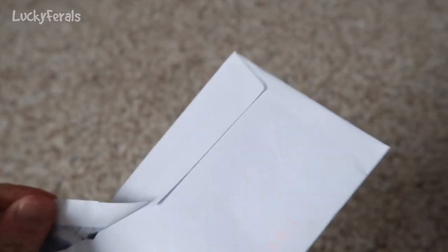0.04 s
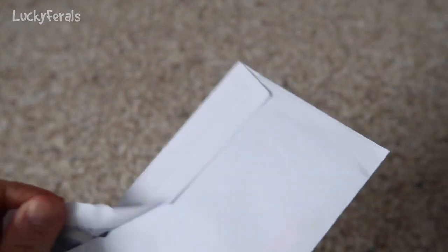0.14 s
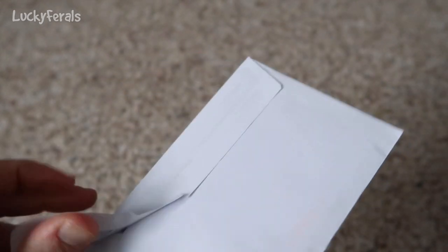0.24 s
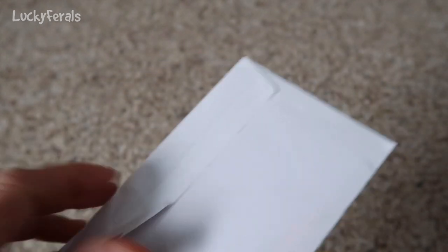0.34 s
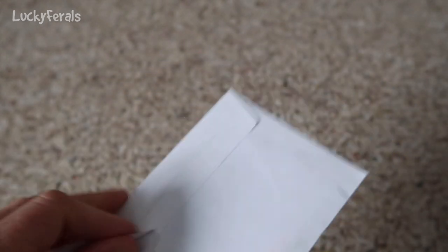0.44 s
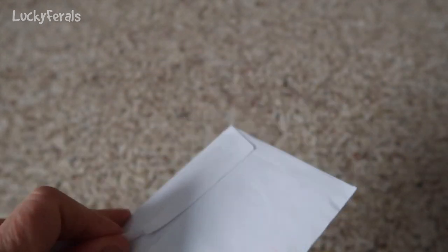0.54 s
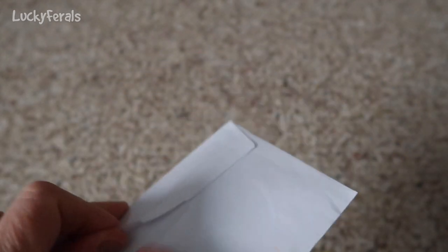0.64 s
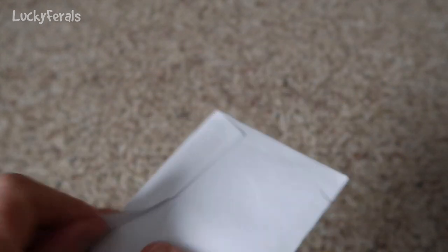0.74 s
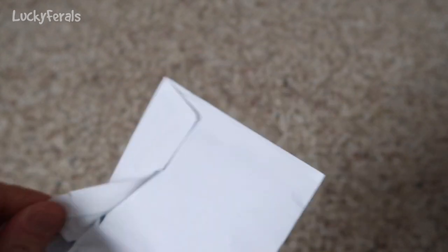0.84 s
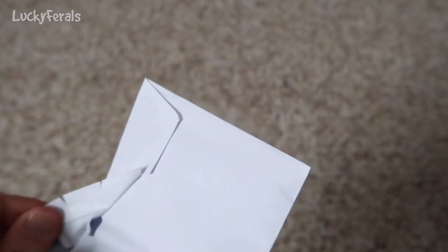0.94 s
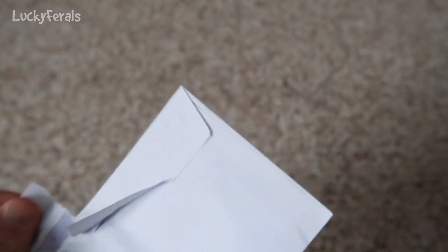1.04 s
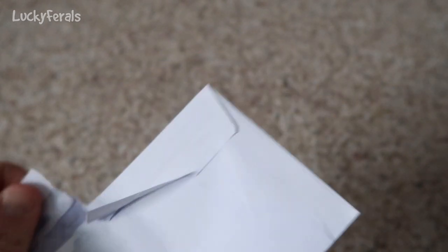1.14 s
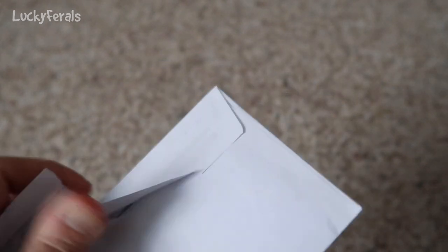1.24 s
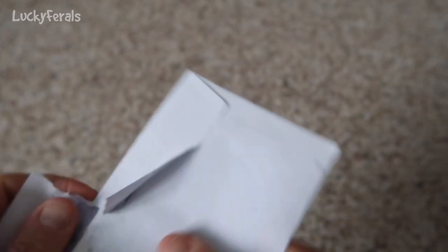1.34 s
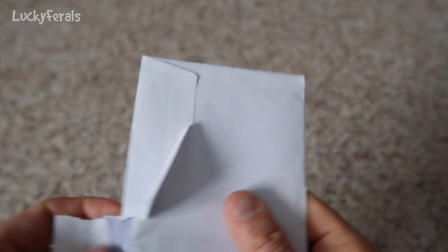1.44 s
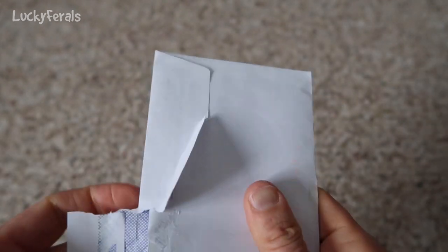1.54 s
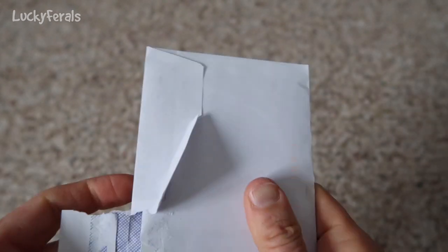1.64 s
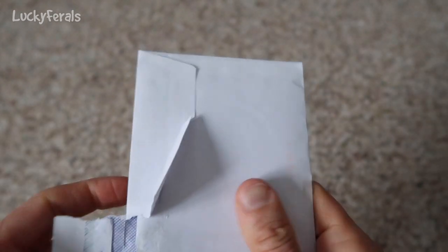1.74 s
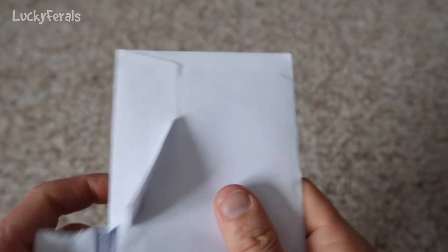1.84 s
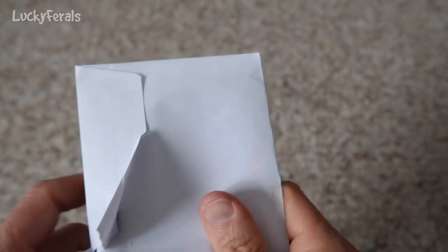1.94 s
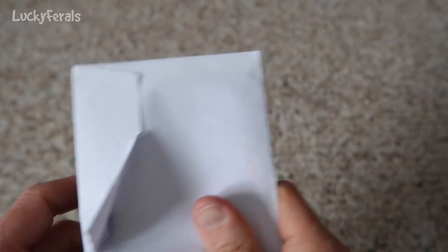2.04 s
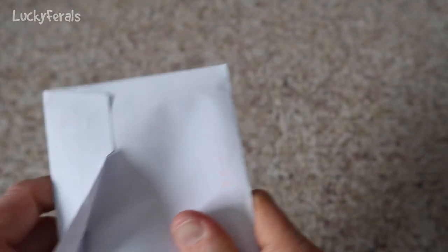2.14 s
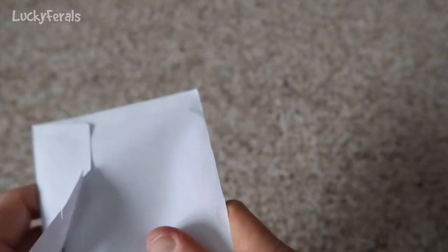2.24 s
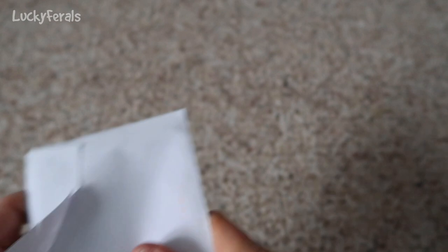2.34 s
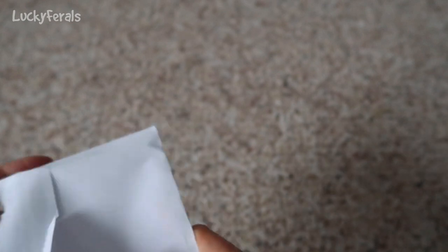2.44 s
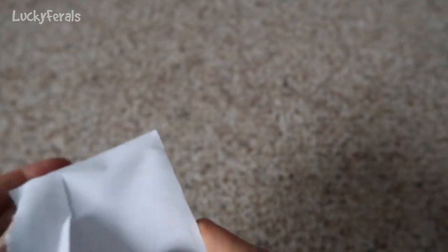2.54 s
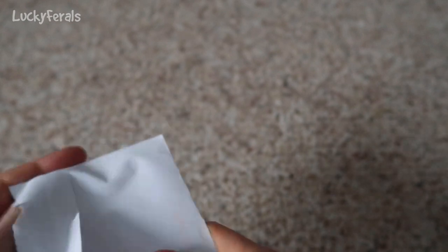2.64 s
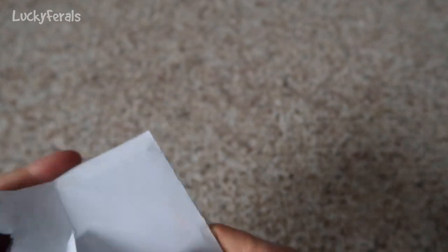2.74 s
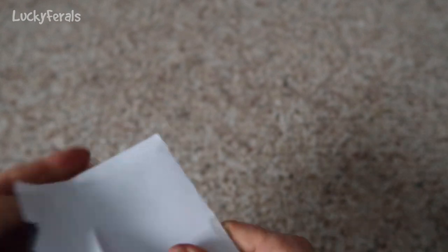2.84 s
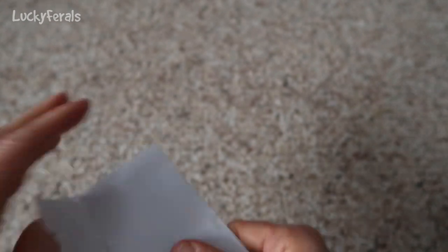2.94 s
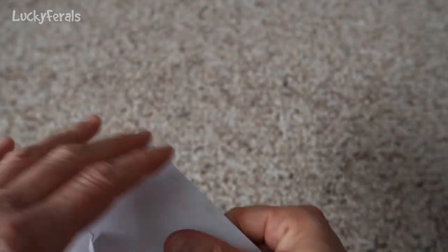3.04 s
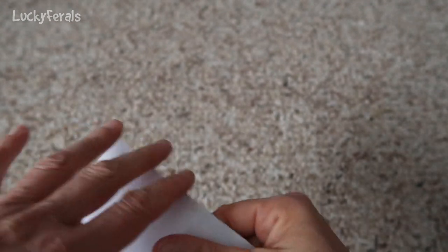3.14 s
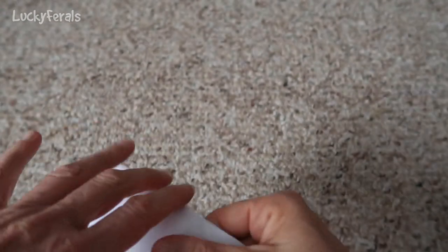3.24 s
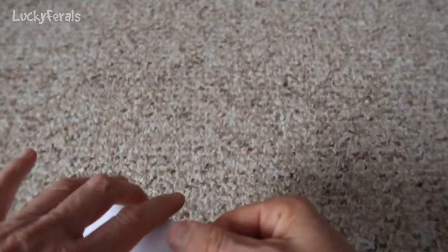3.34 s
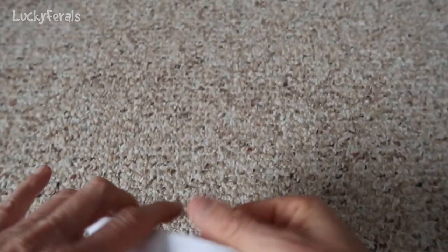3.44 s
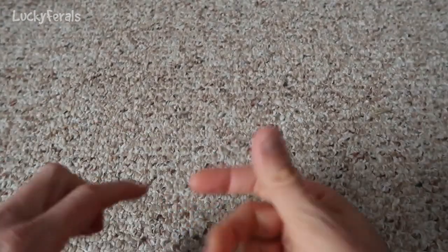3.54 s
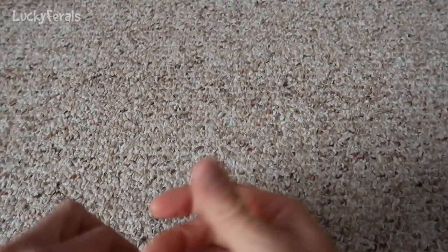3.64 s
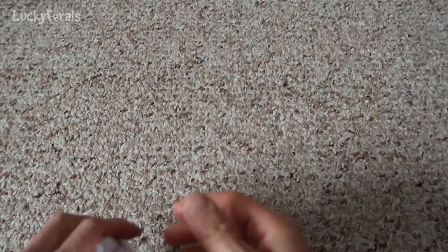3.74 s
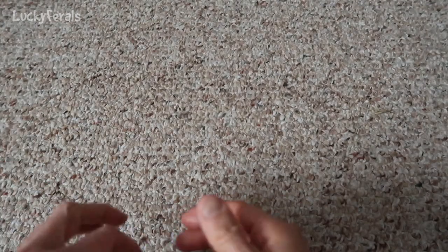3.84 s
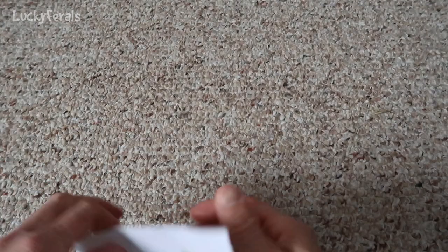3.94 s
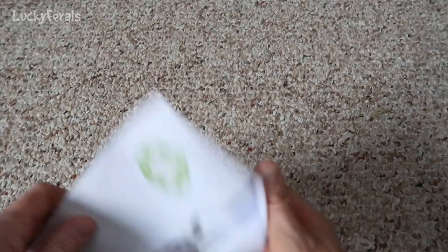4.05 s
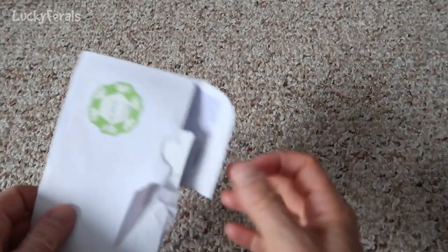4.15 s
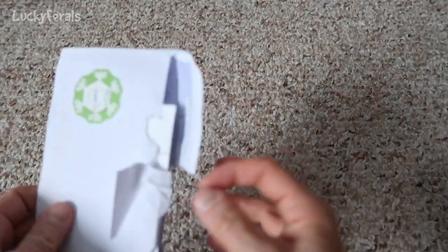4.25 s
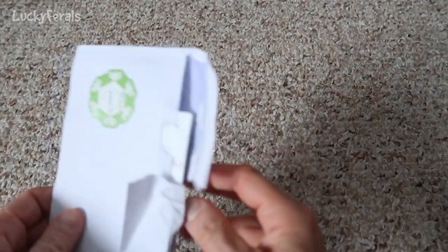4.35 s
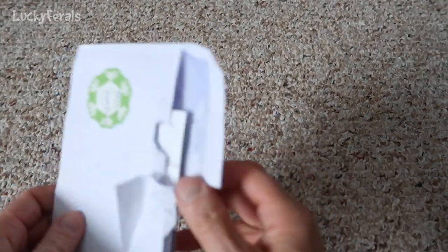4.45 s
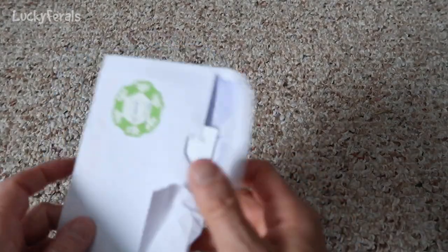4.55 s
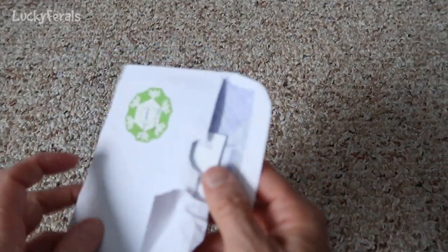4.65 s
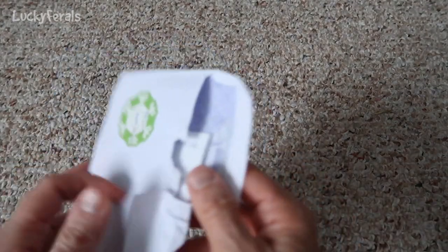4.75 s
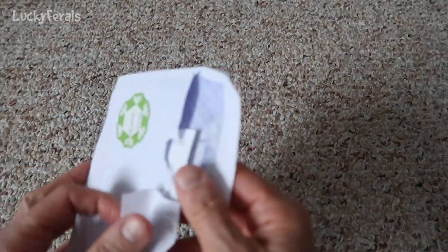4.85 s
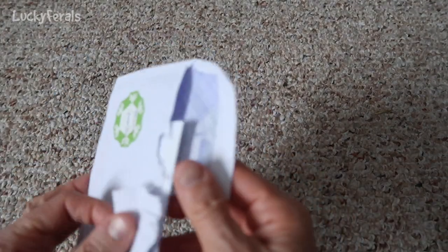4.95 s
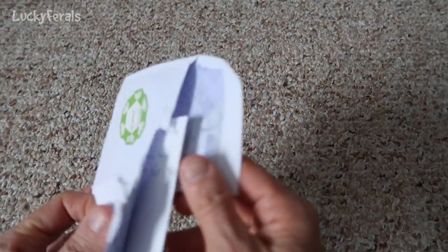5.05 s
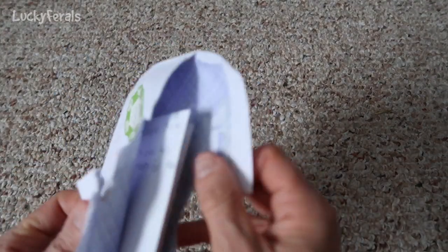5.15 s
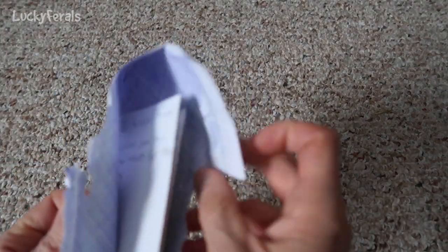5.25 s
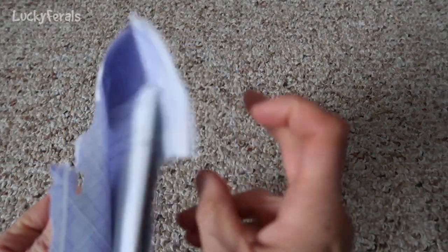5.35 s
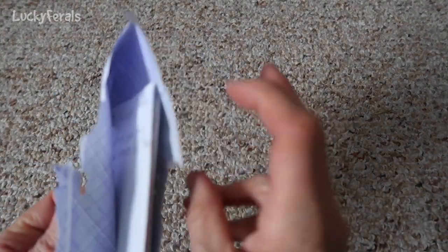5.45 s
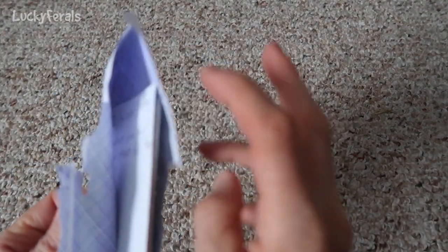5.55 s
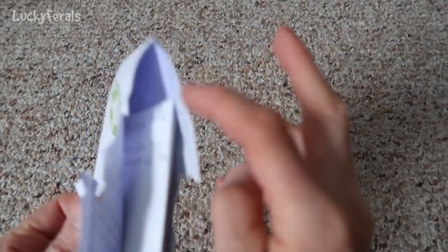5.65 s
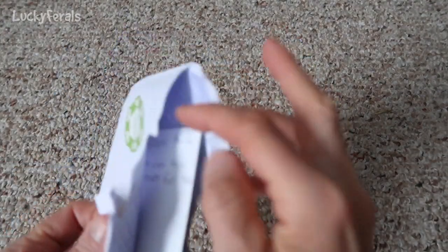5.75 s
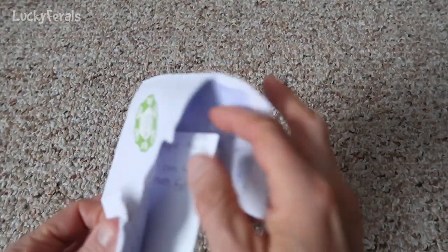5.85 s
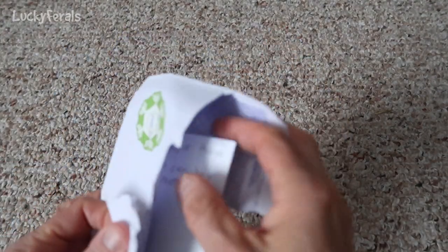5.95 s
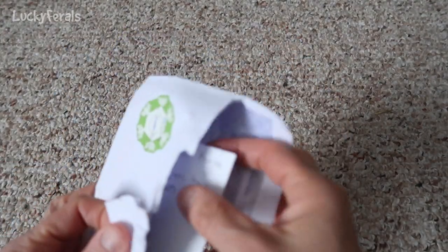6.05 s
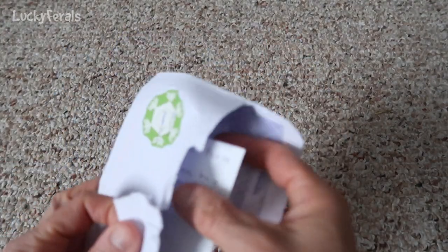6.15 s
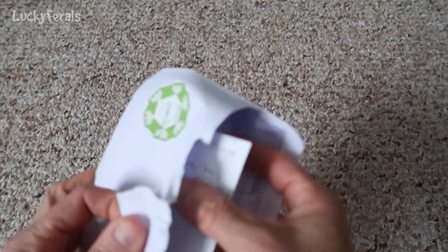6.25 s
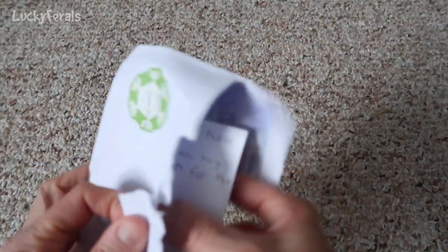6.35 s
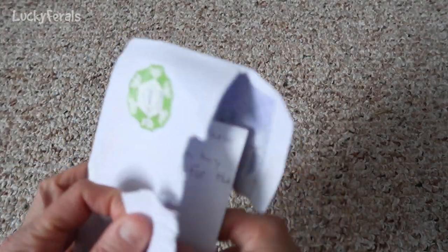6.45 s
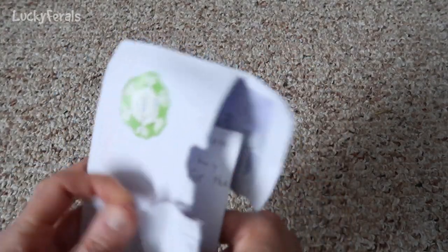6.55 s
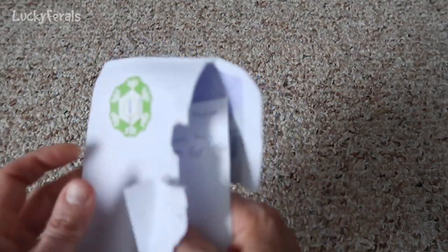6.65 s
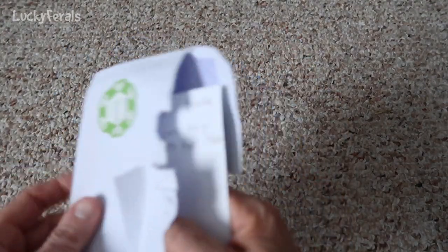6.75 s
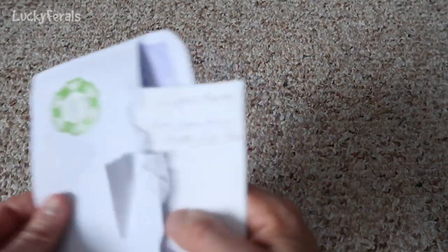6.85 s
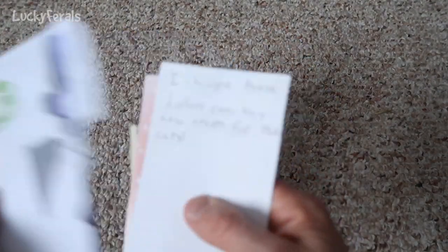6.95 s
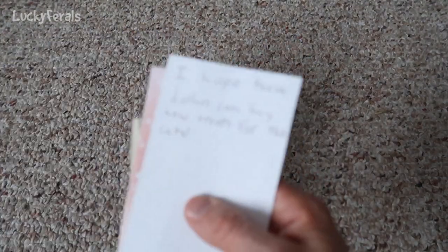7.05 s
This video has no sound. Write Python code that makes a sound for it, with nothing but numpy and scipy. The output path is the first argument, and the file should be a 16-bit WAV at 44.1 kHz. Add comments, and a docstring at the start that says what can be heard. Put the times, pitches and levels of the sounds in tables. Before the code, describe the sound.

Stiff paper tears and crinkles very near the microphone, uneven clusters of bright cracks with fibrous rasp and soft low thumps as the envelope flexes. A long quieter stretch of sparse ticks and light sliding follows, then a short strong burst of snaps and a faint closing rustle. The small room is dry, with a steady low hush.

```python
"""Hands close to a small stereo microphone tear open a paper envelope and draw out a note in a quiet carpeted room.
Rustle and soft hush run throughout: fibre clicks and sliding noise swell with each pull, over steady band noise.
Snaps crowd the first 2.5 s: bursts of small steps ring a panel, crack at the edge and push the sheet.
Soft low thumps of the flexing envelope join from 0.4 s: decaying sines about two cycles long.
Snaps are mostly sparser and fainter to 5.4 s, strong again from 5.9 to 6.5 s, then faint rustle to the end."""
import sys
import numpy as np
from scipy import signal
from scipy.fft import rfft, irfft, next_fast_len
from scipy.io import wavfile

SR = 44100
rng = np.random.default_rng(int(sys.argv[2]) if len(sys.argv) > 2 else 0)


def inscribe(sig):
    """Save sig as 16-bit PCM at rate SR to the path in sys.argv[1].

    A 1-D sig is mono; a 2-D sig holds one channel per row.
    Samples are clipped to [-1, 1] before scaling.
    """
    pcm = np.round(np.clip(np.atleast_2d(sig).T, -1, 1) * 32767)
    wavfile.write(sys.argv[1], SR, pcm.astype(np.int16))


N = 313274

# creases snapping through:
# (time [s], panel peak [dB], panel pitch [Hz], brightness [dB], burst length [ms])
CREASE_SNAPS = [(0.0065, -14.5, 3840, -3, 2), (0.0429, -12, 1230, 4, 3.6), (0.054, -9.5, 3200, 5, 9.6),
                (0.0636, -8, 3500, 13, 1), (0.0824, -15.5, 1980, -12, 2.5), (0.099, -3.5, 3020, 5, 2.5),
                (0.1408, -22, 1490, -6, 1.6), (0.144, -8.5, 1460, -2.5, 3.7),
                (0.2384, -11, 1290, -21.5, 1.94), (0.316, -18.5, 4500, -2, 1.5),
                (0.318, -10, 4100, -10, 2.5), (0.323, -10.5, 810, 6, 1.6), (0.436, -19, 1540, -13, 1.6),
                (0.4873, -10, 1680, -5, 0.57), (0.5232, -28.5, 1540, -23, 2.1), (0.559, -21, 1390, -6, 0.7),
                (0.579, -7, 1400, 0, 4.3), (0.641, -15.5, 4450, 28.5, 0.81),
                (0.6426, -23.5, 940, -34.5, 1.6), (0.703, -31, 1090, -26, 2.4), (0.799, -15, 1430, -7, 3.2),
                (0.806, -8, 2300, 20, 3.2), (0.8246, -3, 1460, 0, 2.7), (0.8301, 0, 1520, 6, 0.63),
                (0.8343, -13.5, 1900, -8, 0.72), (0.859, -13, 1080, -10, 3.2), (0.863, -16, 1200, -8, 1.7),
                (0.892, -24, 1063, 7, 0.76), (0.909, -14.5, 1120, 9, 0.62), (0.9268, -16.5, 4430, 11, 0.65),
                (0.944, -16, 1460, 5, 6.8), (0.954, -16.5, 1500, 26, 3.9), (0.984, -25, 1600, -5, 1.5),
                (0.993, -22.5, 1660, -10, 0.91), (1.0235, -14, 1640, -10, 3), (1.037, -1, 3460, 8, 2.2),
                (1.039, -1, 3470, 4, 2.4), (1.046, -8, 1290, 4, 1.9), (1.051, -5, 2520, 12, 2.5),
                (1.059, -20, 3200, 2, 2), (1.1336, -24.5, 890, -14, 2), (1.1544, -22, 1560, -4, 1.9),
                (1.208, -20.5, 2250, 5, 1.6), (1.227, -30.5, 1510, 8, 1.2), (1.2371, -8, 2040, 0, 3.1),
                (1.245, -8, 1350, -1, 1.25), (1.2502, -17.5, 1630, -10, 5.9), (1.2439, -20, 1460, -7, 1.8),
                (1.4014, -22, 1650, -12, 0.25), (1.4359, -29.5, 570, -13, 1.7),
                (1.4421, -17, 1770, 28, 1.7), (1.529, -24, 1650, 2, 5.1), (1.542, -23.5, 1940, 5, 1.8),
                (1.6643, -19.5, 1470, 6, 0.62), (1.733, -17, 1460, -2, 1.4), (1.7904, -14.5, 1230, -6, 1.5),
                (1.871, 0, 3610, -4, 1.26), (1.91, -26.5, 1300, -4, 3.3), (1.9183, -5.5, 1390, -13, 2.6),
                (1.9404, -0.5, 2650, 6, 2), (1.9638, -15.5, 2610, -20, 1.2), (1.981, -30, 595, -28, 2.2),
                (2.005, -2.5, 2130, -6.5, 3.5), (2.017, -30, 2300, -2, 4.5), (2.061, -19.5, 2230, -5, 4.6),
                (2.149, -25.5, 1350, -4, 7), (2.202, -14, 1710, 23, 1.4), (2.208, -28.5, 790, -31, 1.7),
                (2.223, -19.5, 3300, 4, 6.5), (2.229, -11, 2530, 8, 12), (2.2341, -13.5, 1540, -3, 4.1),
                (2.24, -10, 2400, 4.5, 0.88), (2.2507, -17.5, 1170, -4, 7), (2.263, -11, 2390, 3, 2.4),
                (2.247, -8, 2590, 11, 0.34), (2.295, -2.5, 1580, -9.5, 2.8), (2.331, -26, 900, -20, 3.8),
                (2.35, -16, 1280, -8, 0.38), (2.3699, -27.5, 710, -32, 14), (2.39, -18, 1780, -7, 4.4),
                (2.396, -5, 1650, 6.5, 1.65), (2.409, -12, 1740, 0, 22), (2.4217, -2, 2810, 7, 0.6),
                (2.434, -19, 1500, -1, 2.2), (2.44, -12, 1980, 9, 6.5), (2.448, -4.5, 2620, 3, 6.7),
                (2.469, -31, 1200, 2, 2.6), (2.4554, -9.5, 3930, 5, 0.7), (2.521, -25.5, 4540, 44, 5.1),
                (2.5323, -18, 2450, 6.5, 6.7), (2.563, -29, 2120, 38, 2.4), (2.576, -34, 4500, 13, 1.3),
                (2.639, -22.5, 2100, 32, 0.56), (2.656, -25, 2150, 25, 0.27), (2.699, -29, 1610, -6, 3.3),
                (2.709, -25, 2020, 26, 5.7), (2.733, -22.5, 3040, 20, 0.7), (2.7671, -16.5, 3250, 30, 13),
                (2.948, -28, 1980, 8, 3.1), (2.988, -19.5, 3170, 2, 6.6), (2.9935, -17, 1530, -25.5, 1.8),
                (3.235, -33, 594, -26, 8.1), (3.245, -30, 1500, -22, 1), (3.2768, -14, 4220, 3, 1.5),
                (3.277, -27, 1600, -27, 11), (3.3426, -20.5, 1460, -18, 5.4), (3.452, -14.5, 3000, 3, 1.4),
                (3.51, -12.5, 1460, 21, 2.9), (3.529, -24.5, 1880, -29.5, 3.4), (3.575, -19, 1020, 5, 8.8),
                (3.62, -31.5, 1090, 24, 16), (3.67, -30.5, 1350, -13, 6.8), (3.896, -32, 656, -16, 17),
                (3.945, -23, 1660, -6, 1.3), (4.093, -21, 1960, -1, 3), (4.1245, -21, 1020, 9, 6.7),
                (4.4119, -28, 1690, 1, 1), (4.4118, -24, 5700, 4.5, 1.1), (4.483, -28, 2900, 9, 6.8),
                (4.4967, -34, 925, -28, 3.3), (4.507, -30.5, 810, -25, 5.8), (4.566, -27.5, 2150, 1, 6.1),
                (4.5749, -16, 2050, -7, 3.9), (4.595, -31, 690, -27, 4.8), (4.677, -35.5, 1470, -18, 1.6),
                (4.796, -34, 1980, 12, 2.3), (4.8273, -23, 1480, 17, 0.36), (4.951, -40, 4340, 56, 1.4),
                (5.129, -28.5, 4300, 28, 0.73), (5.143, -27, 3500, -3, 2.2), (5.155, -28.5, 1520, -10, 2.9),
                (5.187, -24, 730, -4, 5.8), (5.2038, -22.5, 3070, -7, 5.9), (5.222, -29, 4400, 9, 2),
                (5.245, -16, 3060, -7, 3.5), (5.2524, -12, 2360, -10, 3.1), (5.268, -27.5, 690, -18, 2.5),
                (5.3755, -26, 2270, 22, 4), (5.392, -27.5, 3440, -6, 3.3), (5.4, -21.5, 880, -18, 2.5),
                (5.856, -3, 3300, 10.5, 3.5), (5.94, -29, 850, -9, 6.4), (6.011, -33, 820, 2, 3.4),
                (6.0294, -20, 1960, -5, 6.4), (6.06, -24, 2520, -23, 7.2), (6.11, -12.5, 2880, 7, 6.1),
                (6.1965, -17, 2340, -10, 4.1), (6.205, -1.5, 2400, 2, 1.9), (6.3161, -7.5, 2460, -7, 2.2),
                (6.3271, -20.5, 2060, -13, 3.6), (6.3605, -22, 2120, -18, 14), (6.4094, 3, 3240, 15, 3.2),
                (6.4376, -11.5, 3620, 5, 5.2), (6.4891, -18.5, 2370, -4.5, 20), (6.52, -15.5, 2360, 5, 2.1),
                (6.566, -25.5, 1010, 3, 5.6), (6.6054, -29, 1400, -11, 10), (6.695, -28, 2530, -1, 5.2),
                (6.8725, -21.5, 950, -14, 3.8), (6.892, -29.5, 570, -14, 3.5), (6.912, -38, 796, -21, 2.6),
                (6.9656, -26.5, 1540, -5, 4.2), (7.0094, -26, 1590, -17, 5.6)]
HARD_PULL_DB = -32   # rasp level of a hard pull


def from_db(db):
    """Gain of a level in dB."""
    return 10 ** (np.asarray(db) / 20)


def rms_one(x):
    """Scaled to rms 1."""
    return x / np.sqrt(np.mean(x ** 2) + 1e-20)


def peak_one(x):
    """Scaled to peak 1."""
    return x / np.max(np.abs(x))


def at_hz(points, hz):
    """A (frequency, value) table read on a log-frequency axis."""
    table_hz, values = np.array(points).T
    return np.interp(np.log(hz), np.log(table_hz + 1e-9), values)


def band(x, low_hz, high_hz):
    """Butterworth band-pass."""
    high_hz = min(high_hz, .45 * SR)
    return signal.sosfilt(signal.butter(2, [low_hz, high_hz], "band", fs=SR, output="sos"), x)


def drift(rate_hz):
    """Slow random wander of rms 1: noise through two equal one-pole low-passes."""
    settle = 9000
    r = np.exp(-2 * np.pi * rate_hz / SR)
    noise = rng.standard_normal(N + settle)
    return rms_one(signal.lfilter([1], [1, -2 * r, r * r], noise)[settle:])


def rustle_levels():
    """Rasp, hiss and body in dB: the handling, each pull and the wake of each snap add in power."""
    # fingers resting and shifting on the paper: (time [s], rasp [dB], hiss [dB])
    handling = [(0, -36.5, -53), (0.42, -53, -48), (0.68, -43.5, -44.5), (1.3, -47.5, -53.5),
                (1.8, -51.5, -51.5), (2.6, -50, -45), (2.87, -59.5, -66), (3.2, -61.5, -65),
                (4.05, -66.5, -49), (4.24, -80.5, -70), (4.78, -81, -55.5), (5.15, -52, -53.5),
                (5.47, -63.5, -66.5), (5.82, -63.5, -64), (5.95, -46, -49.5), (6.6, -46.5, -47),
                (7.1, -57.5, -56.5)]
    # pulls that tear or slide the paper:
    # (peak time [s], rasp [dB], rise [ms], fall [ms], hiss re rasp [dB], body re rasp [dB])
    pulls = [(0.0, -31.5, 50, 175, 3.5, -6.5), (0.493, -37.5, 93, 36, -1.5, -5),
             (0.765, -34.5, 38, 30, -1.5, 3.5), (0.817, -22.5, 70, 174, -2.5, -12.5),
             (1.049, -24, 27, 25, 4.5, -5), (1.54, -42.5, 410, 77, -1, -6),
             (1.924, -29.5, 46, 110, -0.5, 3), (2.241, -29.5, 230, 78, -5, -6.5),
             (2.441, -20.5, 30, 80, 2, -15), (2.714, -35.5, 28, 95, 3, -22), (2.771, -32.5, 73, 53, 4, -4),
             (2.938, -47.5, 92, 280, 3.5, -8.5), (3.288, -44.5, 240, 1080, -4, -0.5),
             (3.523, -29, 45, 82, -2, -4), (3.731, -42, 40, 78, -4.5, 2), (3.952, -38.5, 100, 44, -7, 0),
             (4.12, -36, 91, 54, -0.5, -6.5), (4.401, -49.5, 25, 39, -6, 7.5), (4.5, -42, 59, 314, -3, 0),
             (4.574, -46, 43, 110, -9, 3.5), (4.9, -48, 110, 155, -8, -3.5), (5.05, -48.5, 130, 71, 3, -8),
             (5.259, -38.5, 71, 115, -4.5, 1), (5.381, -34.5, 22, 59, -3.5, 2.5),
             (6.05, -50, 35, 330, -20, 9), (6.408, -32, 140, 100, 0, -2), (6.705, -46.5, 64, 130, 1, -19),
             (6.963, -41.5, 360, 152, 1, 1.5)]
    handling_body_db = -6.5   # re rasp
    slope_db = 20   # gained over a rise, lost over a fall
    wake_db, wake_rise_ms, wake_fall_ms = -26.5, 1, 49   # level re the snap's panel peak
    wake_hiss_db, wake_body_db = -6.5, -2   # re the wake's rasp

    t = np.arange(0, N + 64, 64) / SR
    s, rasp_db, hiss_db = np.transpose(handling)
    bases_db = (rasp_db, hiss_db, rasp_db + handling_body_db)
    power = from_db([np.interp(t, s, db) for db in bases_db]) ** 2
    wakes = [(c[0], c[1] + wake_db, wake_rise_ms, wake_fall_ms, wake_hiss_db, wake_body_db)
             for c in CREASE_SNAPS]
    for s, db, rise_ms, fall_ms, hiss_db, body_db in list(pulls) + wakes:
        away = 1000 * np.abs(t - s) / np.where(t < s, rise_ms, fall_ms)
        colour_db = np.array([[0], [hiss_db], [body_db]])
        power += from_db(db - slope_db * away + colour_db) ** 2
    return [np.interp(np.arange(N) / SR, t, 10 * np.log10(p)) for p in power]


def ticks(rasp_db):
    """Scattered small buckles: lone clicks, each ringing a patch of its own size for a few cycles."""
    rate_per_s, share = 160, .65   # share re rasp
    growth = .2   # gentle sliding buckles less: extra dB per dB of rasp
    width = 1.5   # pitch ratio to either side

    born = rng.random(N) < rate_per_s / SR
    sizes = from_db(4.5 * np.minimum(rng.exponential(1, N), 3.5))
    clicks = born * sizes * rng.choice([-1, 1], N)
    pitches_hz, dealt = np.geomspace(300, 4500, 14), rng.integers(0, 14, N)
    out = 0
    for k, hz in enumerate(pitches_hz):
        own = clicks * (dealt == k) + 1e-18
        out = out + band(own, hz / width, hz * width) / np.sqrt(hz)
    return share * from_db(rasp_db + growth * (rasp_db - HARD_PULL_DB)) * rms_one(out)


def rustle():
    """Clumped fibre clicks of uneven size, each ringing a small patch of sheet, over sliding noise."""
    # colour of the paper, relative within rasp, hiss and body: (frequency [Hz], density [dB])
    paper_colour = [(88, -37), (150, 2.5), (524, 1), (905, -1), (1480, -3), (1690, -4), (1900, -1.5),
                    (4240, -4.5), (6910, -11), (12400, -16), (16000, -41)]
    clicks_per_s = 1600   # before clumping
    grain_growth = .15   # gentle sliding is smoother: dB of clicks per dB of rasp

    levels_db = rustle_levels()
    clump = drift(48)
    born = rng.random(N) < clicks_per_s * from_db(4.5 * drift(70)) / SR
    sizes = from_db(3.2 * np.minimum(rng.exponential(1, N), 4.5))
    clicks = born * sizes * rng.choice([-1, 1], N)
    patch = rng.integers(0, 4, N)   # a click drives its own patch fully, the others weakly
    grain = from_db(np.minimum(grain_growth * (levels_db[0] - HARD_PULL_DB), 0))
    slide = rng.standard_normal((2, N))

    edges_hz = 150 * 2 ** np.arange(0, 7.0, .5)
    groups = np.zeros((3, N))   # rasp, hiss, body
    for k, (low, high) in enumerate(zip(edges_hz, edges_hz[1:])):
        hz = np.sqrt(low * high)
        patch_clicks = rms_one(clicks * np.where(patch == k % 4, 1, .4))
        drive = grain * patch_clicks + np.sqrt(1.12 - grain ** 2) * slide[k % 2]
        group = 0 if 800 < hz < 4000 else 1 if hz > 4000 else 2
        flicker_db = 2.0 * drift(27)
        groups[group] += from_db(at_hz(paper_colour, hz) + flicker_db) * band(drive, low, high)

    swell = from_db(1.4 * clump)
    rub = swell * sum(from_db(db) * rms_one(g) for db, g in zip(levels_db, groups))
    # treble from all over the sheet, opposite in the two ports
    wide = .5 * from_db(levels_db[1]) * rms_one(band(slide[0, ::-1], 5200, 9600))
    return rub + ticks(levels_db[0]), swell * wide


def hush():
    """Steady room and microphone noise in half-octave bands: bass mostly alike, opposite near 4 kHz."""
    # noise colour, scaled as a whole below: (frequency [Hz], density [dB])
    colour = [(12, -41), (20, -8), (49, -5), (101, -4), (172, -16), (210, -10.5), (328, -16), (3250, -31),
              (12400, -47.5), (14300, -56.5), (16000, -67)]
    # left-right likeness: (frequency [Hz], correlation [1], held within -1 to 1)
    likeness = [(90, 1), (160, 0.85), (300, 0.049), (520, -0.2), (900, 0.13), (4000, -1.3), (15000, 0.59)]
    level_db = -48.5   # rms

    out, edges_hz = 0, 18 * 2 ** np.arange(0, 10.1, .5)
    white = rng.standard_normal((2, 2, N))
    for k, (low, high) in enumerate(zip(edges_hz, edges_hz[1:])):
        mid, side = band(white[k % 2], low, high)
        hz = np.sqrt(low * high)
        alike = np.clip(at_hz(likeness, hz), -1, 1)
        stereo = np.sqrt(1 + alike) * mid + np.sqrt(1 - alike) * side * [[1], [-1]]
        out = out + from_db(at_hz(colour, hz)) * stereo
    return from_db(level_db) * rms_one(out)


def snaps():
    """A crease creaks, then gives way in one firm step and a dying run: panel ring, crack and push."""
    creep_ms, creep_db = 4.0, -21   # creak before the snap: time constant, level re the steps
    step_firmness = 26   # main step re the small ones
    crack_base_db, push_base_db = -8, -8.5   # re panel, at brightness 0
    thin_slope = 1.6   # extra dB of push lost per dB of brightness over 5
    crack_share = .57   # crack and push last this share of the burst
    panel_width = 1.42   # pitch ratio to either side

    size, lead = 2048, 512
    out = np.zeros((2, N + 4096))
    ms = 1000 * (np.arange(size) - lead) / SR
    jolts = rng.standard_normal((len(CREASE_SNAPS), 2, size)) ** 3   # few large, many small
    jolts[:, :, lead] = step_firmness * np.sign(jolts[:, :, lead])
    creep = from_db(creep_db) * np.exp(np.minimum(ms, 0) / creep_ms)
    after_ms = np.maximum(ms, 0)

    def envelope(span_ms):
        """Creak, then fast fall with a faint 110 ms tail."""
        fall = np.exp(-(after_ms / max(span_ms, .2)) ** 1.71)
        return np.where(ms < 0, creep, fall + .035 * np.exp(-after_ms / 110))

    for (s, peak_db, hz, bright_db, burst_ms), (jolt, aside) in zip(CREASE_SNAPS, jolts):
        crack_gain = from_db(crack_base_db + bright_db / 2)
        push_db = push_base_db - bright_db / 2 - thin_slope * max(bright_db - 5, 0)
        shape, short = envelope(burst_ms), envelope(crack_share * burst_ms)
        burst, short_burst = jolt * shape, jolt * short

        ring = peak_one(band(band(burst, hz / 2, hz * 2), hz / panel_width, hz * panel_width))
        broad = peak_one(band(band(burst, 340, 4380), 580, 5100))
        panel = peak_one(ring + 1.26 * from_db(.12 * bright_db) * broad)
        crack = crack_gain * peak_one(band(signal.lfilter([1], [1, -.6], short_burst), 4000, 12500))
        push = from_db(push_db) * peak_one(band(band(short_burst, 194, 1640), 301, 777))

        # the snap comes from scattered points, so part of it differs between the ports
        side_crack = peak_one(band(signal.lfilter([1], [1, -.4], aside * short), 3100, 15000))
        side_panel = peak_one(band(aside * shape, 990, 5600))
        scatter = .27 * crack_gain * side_crack + .098 * side_panel
        at = round(s * SR)
        out[:, at:at + size] += from_db(peak_db) * np.array([panel + crack + push, scatter])
    return out[:, lead:N + lead]


def flexes():
    """The whole envelope flexing: a soft push of air, about two cycles long."""
    # (time [s], peak [dB], pitch [Hz])
    thumps = [(0.434, -26.5, 127), (0.744, -44, 52.4), (1.033, -28, 191), (1.238, -23, 158),
              (1.786, -32, 120), (1.869, -36, 91), (2.388, -28.5, 189), (3.517, -36, 102), (3.934, -37, 86),
              (5.236, -36, 116), (5.375, -33, 100), (5.671, -44, 77.7), (5.84, -35, 73), (6.11, -23.5, 108),
              (6.193, -29.5, 136), (6.397, -24, 175)]
    size = 8192
    out = np.zeros(N + size)
    for s, peak_db, hz in thumps:
        cycles, at = np.arange(size) / SR * hz, round(s * SR)
        pulse = cycles * np.exp(-1.3 * cycles) * np.sin(2 * np.pi * cycles)
        out[at:at + size] += from_db(peak_db) * peak_one(pulse)
    return out[:N]


def sheet(x):
    """The envelope's air pocket and panels ring briefly with every click: two-pole resonances."""
    # (frequency [Hz], width [Hz], level re direct [dB])
    resonances = [(610, 110, -9), (1460, 98, -2), (2150, 64, -9)]
    out = x.copy()
    for hz, width_hz, level_db in resonances:
        r = np.exp(-np.pi * width_hz / SR)
        zeros = [(1 - r * r) / 2, 0, (r * r - 1) / 2]
        poles = [1, -2 * r * np.cos(2 * np.pi * hz / SR), r * r]
        out += from_db(level_db) * signal.lfilter(zeros, poles, x)
    return out


def room(x):
    """Eight feedback delays a side, duller on every round."""
    t60_s, wall_cut_hz = .34, 7800   # decay in the bass; low-pass of each round
    size = next_fast_len(N + SR)
    bins = np.arange(size // 2 + 1)
    turn = np.exp(-2j * np.pi * bins / size)   # one sample of delay
    dull = np.exp(-2 * np.pi * wall_cut_hz / SR)
    wall = (1 - dull) / (1 - dull * turn)
    walls = np.zeros((2, size // 2 + 1), complex)
    lags = (rng.uniform(.021, .088, 16) * SR).astype(int)
    for k, lag in enumerate(lags):
        loop = from_db(-60 * lag / SR / t60_s) * wall * np.exp(-2j * np.pi * lag * bins / size)
        walls[k % 2] += (-1) ** (k // 2) * loop / (1 - loop)
    return irfft(rfft(x, size) * walls, size)[:, :N]


def ports(x):
    """Paper held to the left reaches the two ports with a phase difference that varies with frequency."""
    # left port ahead of right for paper at the left: (frequency [Hz], phase [rad])
    lead_phase = [(1000, 0.0), (2500, -0.2), (4000, 0.53), (6890, -0.34), (9300, 2.06), (11700, 2),
                  (15400, 4.5)]
    # where the paper is held: (time [s], position [0 in front to 1 at the left])
    leftward = [(0, 0.46), (2.7, 0.82), (3.2, 0.56), (3.55, 0.53), (4.3, 0.36), (5.2, 0.44), (6.4, 0.31),
                (6.8, 0.1), (7.1, 0.49)]
    size = next_fast_len(N + 256)
    share = np.clip(np.interp(np.arange(N) / SR, *np.transpose(leftward)), 0, 1)
    hz = np.arange(1, size // 2 + 2) / size * SR
    half = np.exp(.5j * at_hz(lead_phase, hz))
    aslant = irfft(rfft(share * x, size) * np.array([half, half.conj()]), size)[:, :N]
    return (aslant + (1 - share) * x) * from_db([[.2], [-.2]])


def scene():
    """Paper close by, its room, and the hush."""
    room_gain = from_db(-27)
    wall_width = .3   # share of the room that differs between the ports
    snap, snap_side = snaps()
    rub, rub_side = rustle()
    paper = sheet(snap + rub) + flexes()
    left, right = room(paper)
    # close-set ports hear nearly the same room
    walls = room_gain * (left + right) / 2
    wall_side = wall_width * room_gain * band(left - right, 700, 9000)
    side = snap_side + rub_side + wall_side
    return ports(paper + walls) + side * [[1], [-1]] + hush()


def record(dry):
    """Peaks clip at full scale; a steep low-pass cuts the top."""
    cutoff_hz = 16600   # stop-band edge
    top_cut = signal.cheby2(14, 90, cutoff_hz, fs=SR, output="sos")
    return signal.sosfilt(top_cut, np.clip(dry, -1, 1))


dry = scene()
out = record(dry)
inscribe(out)
```